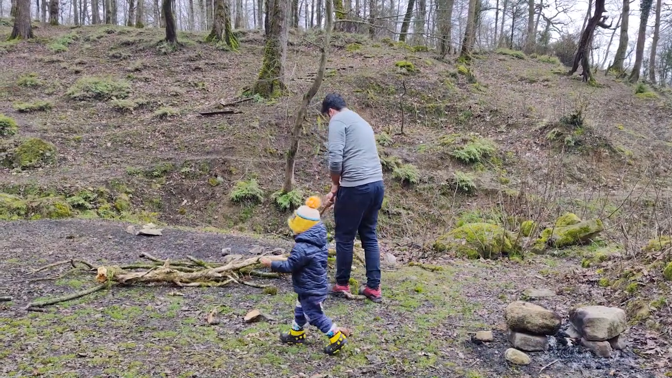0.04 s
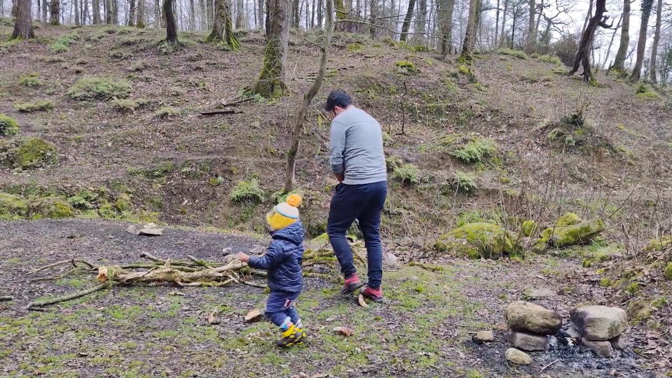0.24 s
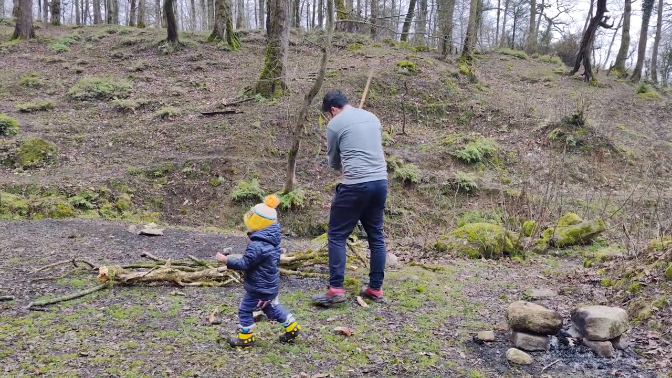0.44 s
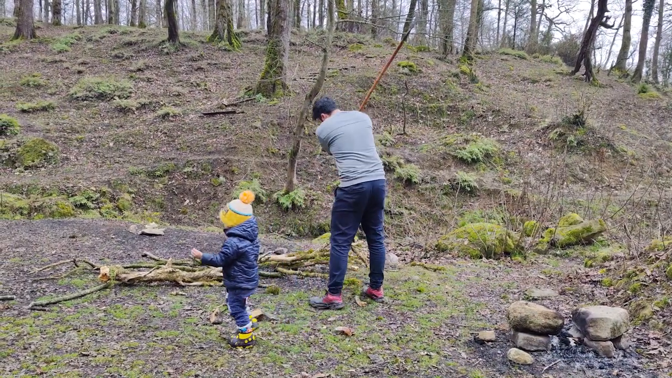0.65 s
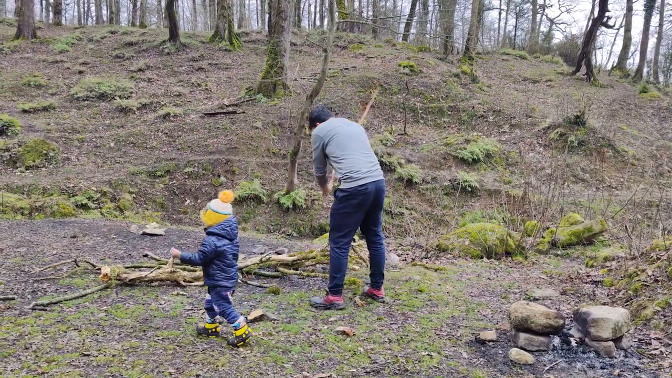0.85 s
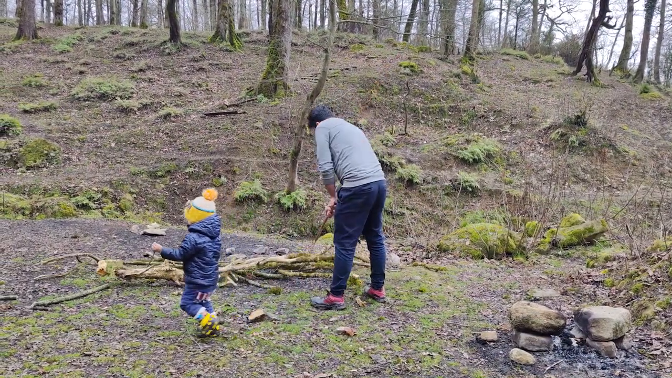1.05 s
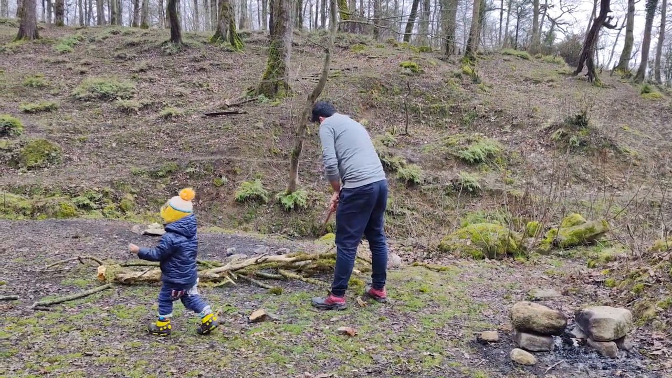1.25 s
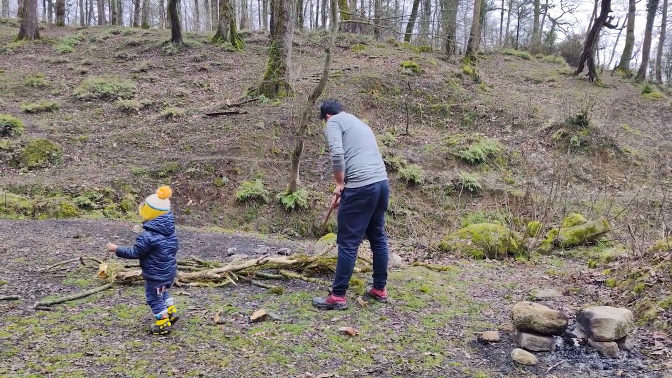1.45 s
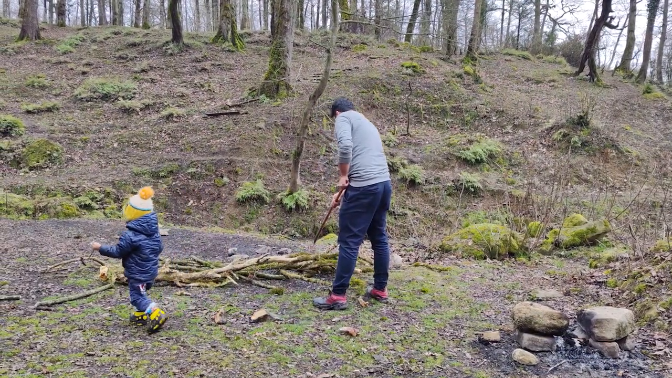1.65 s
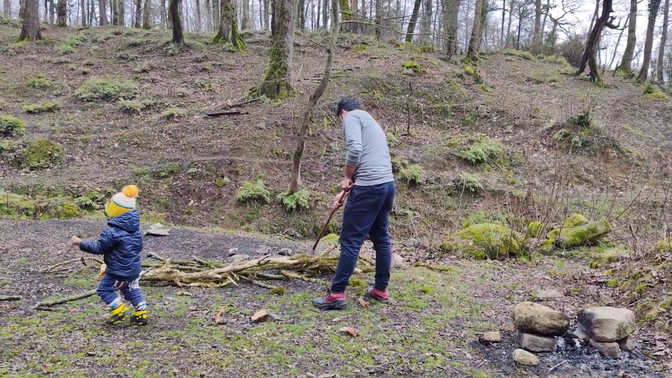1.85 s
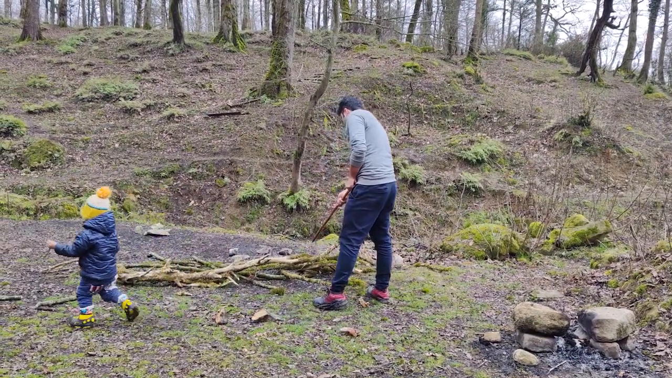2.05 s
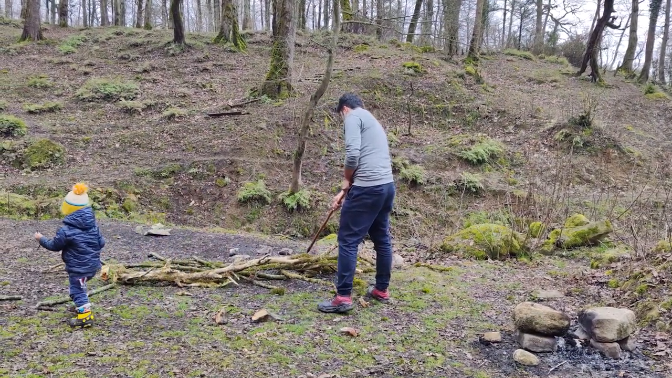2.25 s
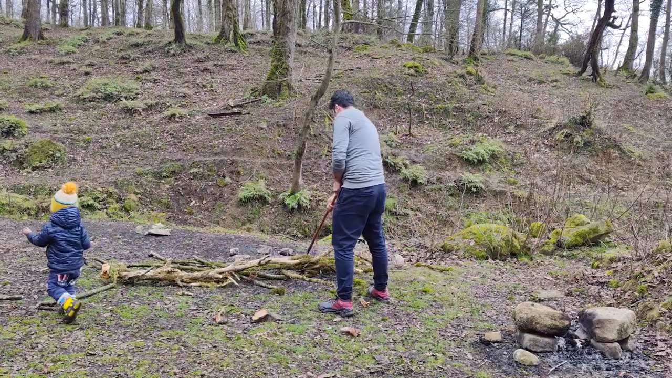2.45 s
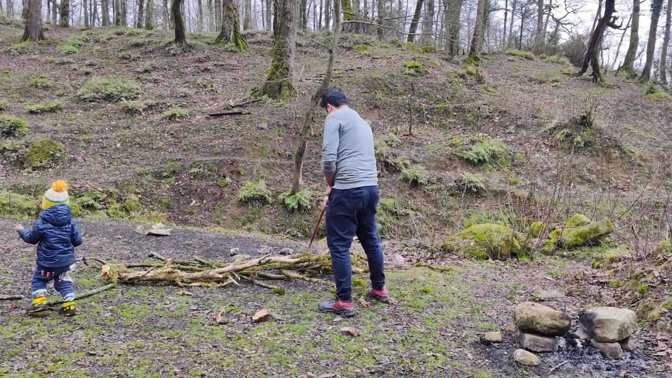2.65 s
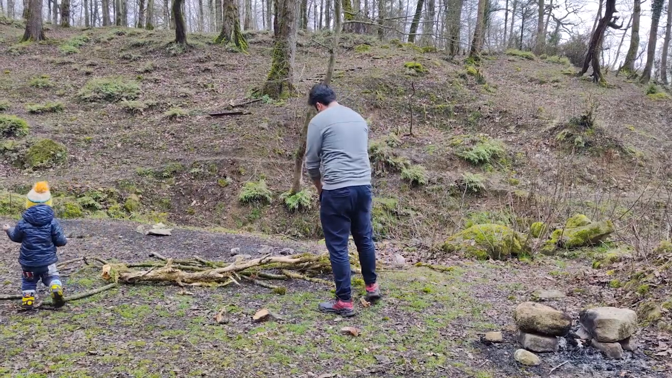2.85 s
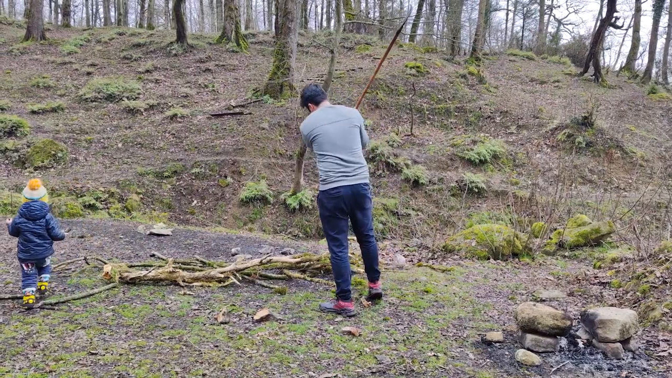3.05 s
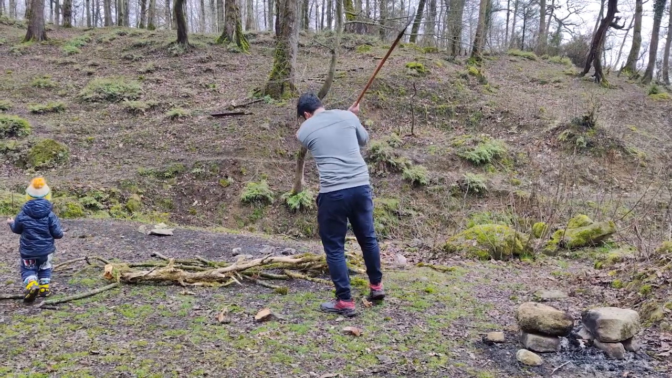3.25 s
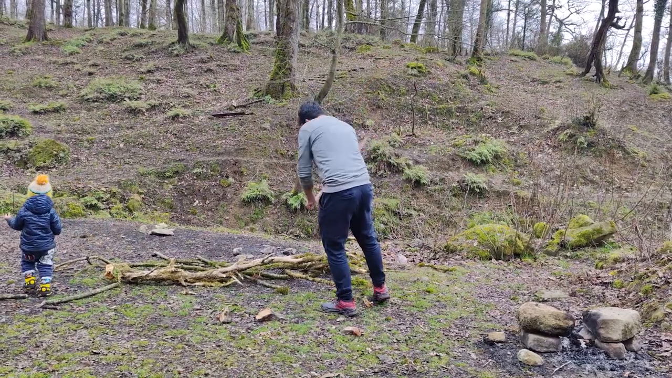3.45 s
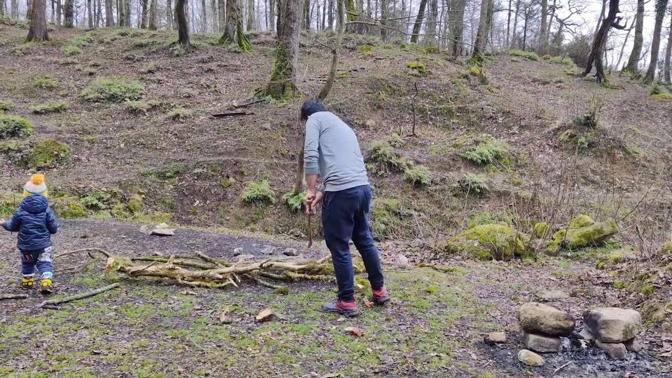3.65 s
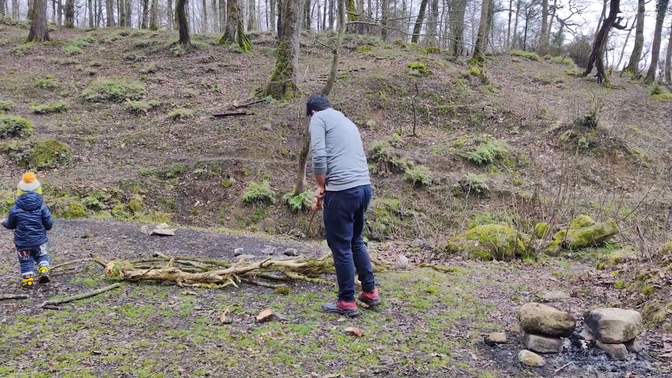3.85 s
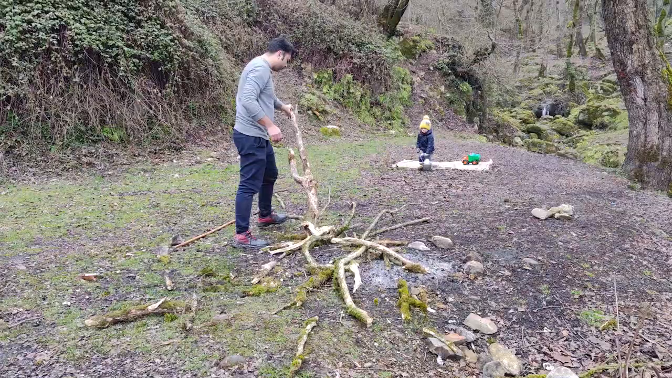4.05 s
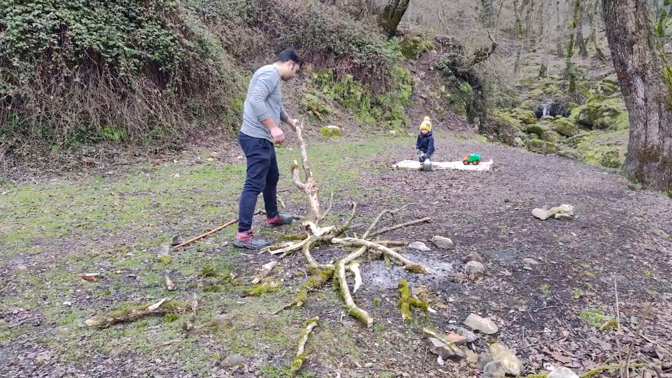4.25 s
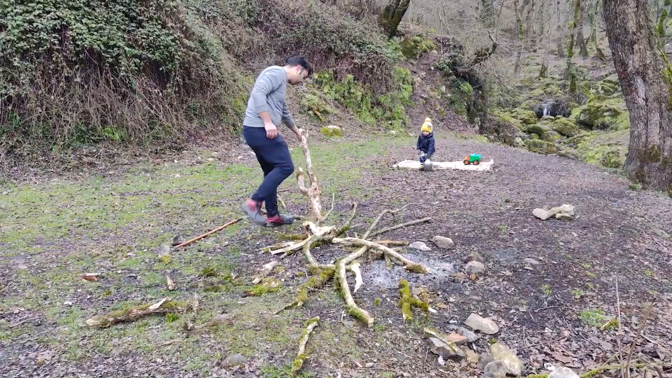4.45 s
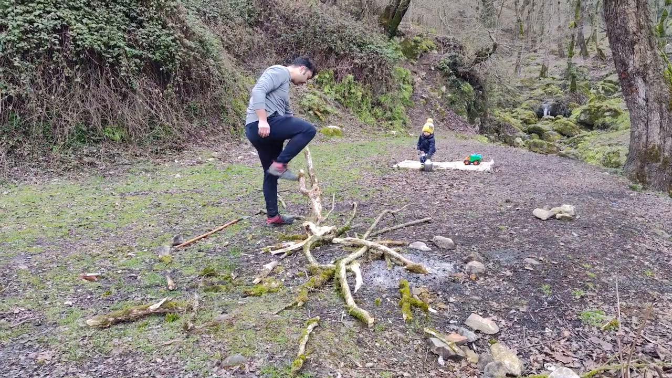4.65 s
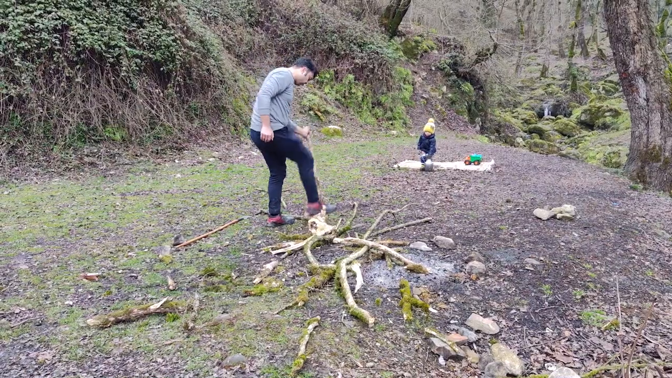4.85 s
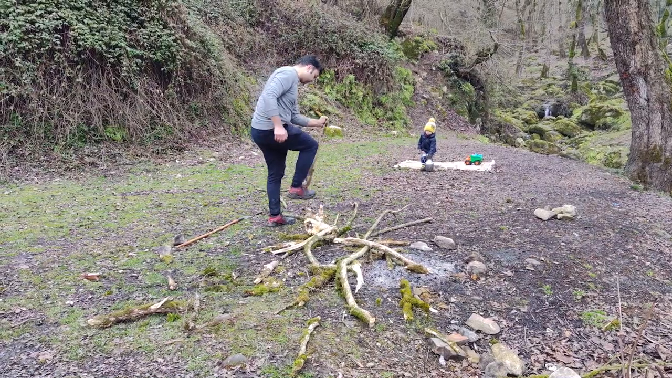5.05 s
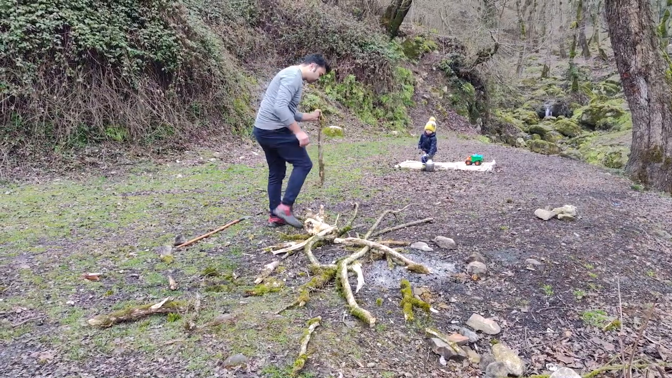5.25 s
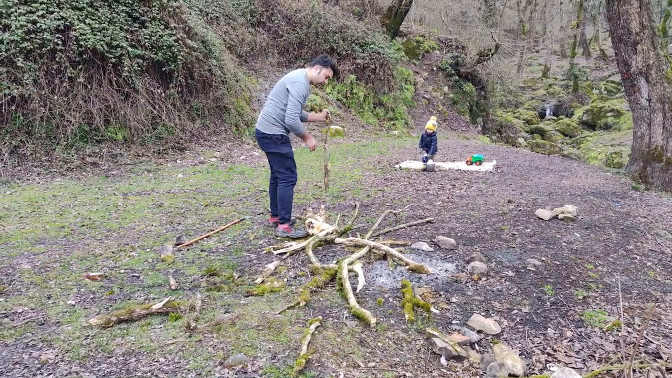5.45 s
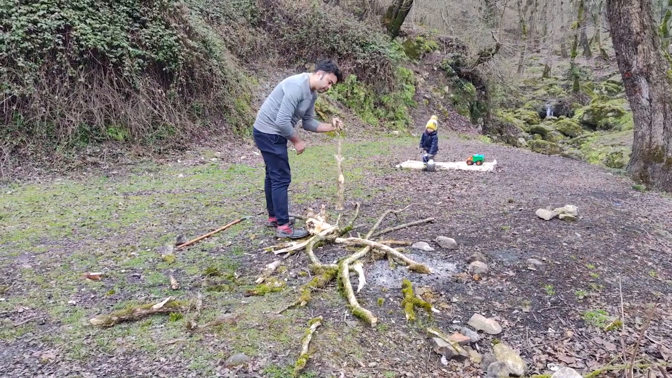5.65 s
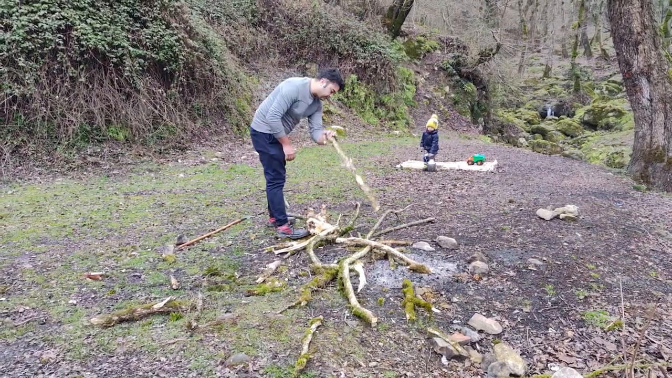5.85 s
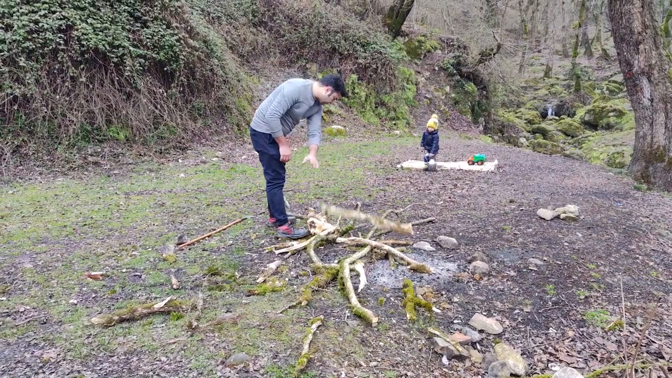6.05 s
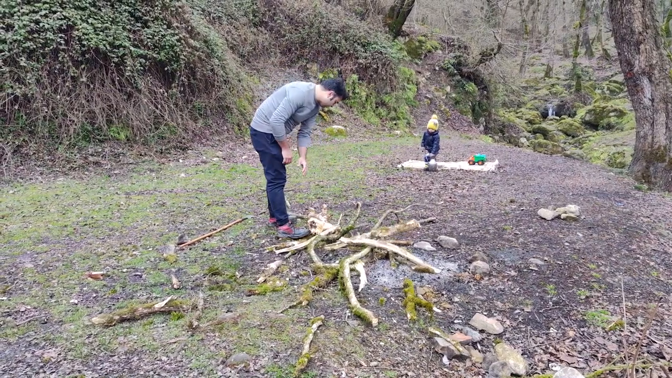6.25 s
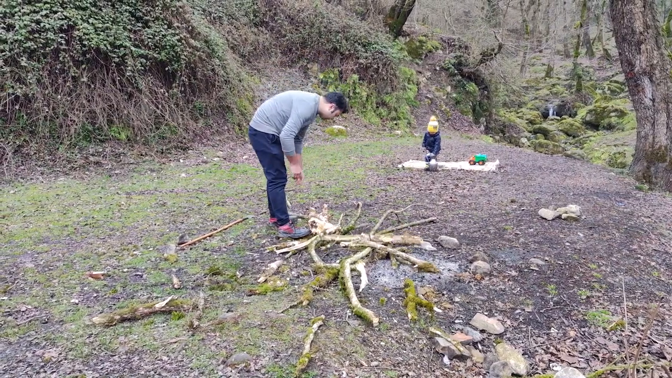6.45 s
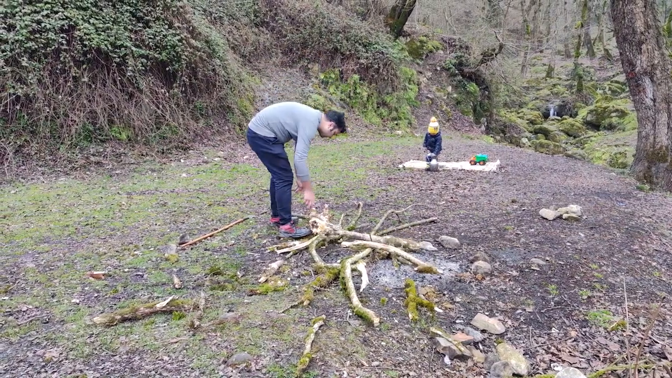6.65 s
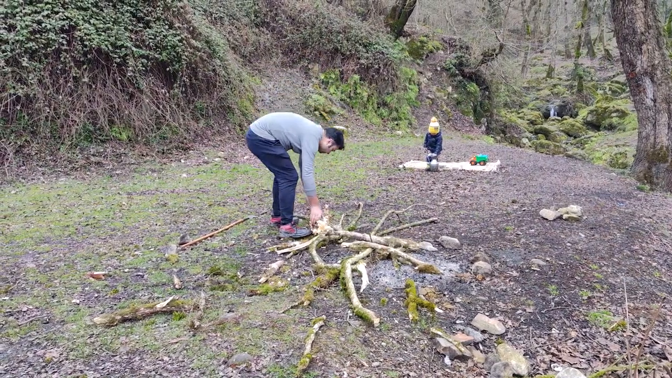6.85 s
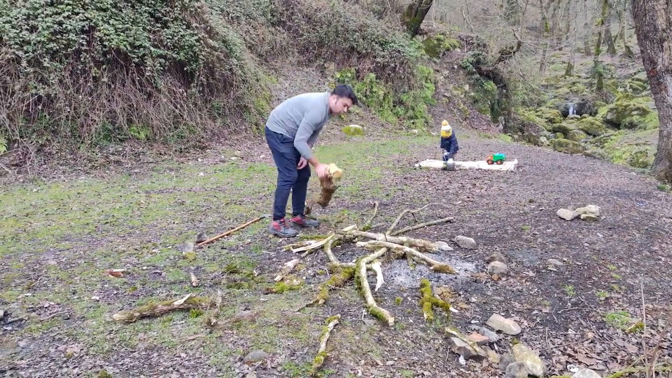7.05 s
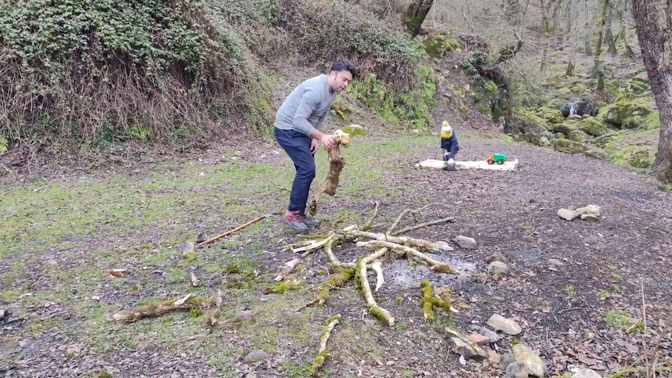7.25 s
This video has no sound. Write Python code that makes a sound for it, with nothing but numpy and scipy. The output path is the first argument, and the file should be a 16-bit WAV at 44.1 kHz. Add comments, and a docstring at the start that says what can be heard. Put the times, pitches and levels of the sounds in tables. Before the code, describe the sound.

Sharp woody cracks ring out unevenly with short forest echoes, followed by a stomp, a tiny splinter snap and a wooden drop, with birds and a stream behind.

```python
"""Breaking firewood in a woodland clearing

Two axe blows split dry branches below an earth bank; then, at a more open spot, a branch is stamped through,
a last splinter snaps and the piece is tossed on the pile. Cracks are dying bursts of uneven noise, with
decaying sines for the ringing wood. Bank and trees scatter them as echoes made of noise. A brook of filtered
noise runs behind, small birds call in sliding sines and something metal clinks far off in decaying modes."""
import sys
import numpy as np
from scipy import signal
from scipy.fft import rfft, irfft, next_fast_len
from scipy.io import wavfile

SR = 44100
rng = np.random.default_rng(int(sys.argv[2]) if len(sys.argv) > 2 else 0)


def dump(signal):
    """Clip the signal to [-1, 1] and save it as 16-bit WAV at the path in sys.argv[1]."""
    limited = np.clip(np.atleast_2d(signal).T, -1, 1)
    pcm = np.round(limited * 32767).astype(np.int16)
    wavfile.write(sys.argv[1], SR, pcm)


N = 321930
TIME = np.arange(N) / SR
HALF_SECOND = SR // 2  # samples
SIZE = next_fast_len(N + SR)  # transform length, with a second to spare
HZ = np.maximum(np.arange(SIZE // 2 + 1) * SR / SIZE, 1)
MOVE_S = 4.1  # the work moves from the bank to the open spot

# Source levels and left-right differences hold ahead of the filters that follow.
# Branches break. Each row: start in seconds, crack level in dB, crack decay time (60 dB) in seconds,
# corner in Hz above which it is dull, left-right difference in dB, splinter level in dB,
# thud level in dB, thud pitch in Hz.
BREAKS = [(1.1067, 2, 0.028, 4220, -1, -1, -30.5, 165), (3.68, 4.5, 0.02, 2170, 4, -5.5, -17, 235),
          (4.9603, 3.5, 0.019, 1560, 3.5, -2.5, -14, 268), (5.5422, -14, 0.0058, 14000, 0, -21, -31, 236)]
# A boot or a log comes down. Each row: start in seconds, level of the bark's crunch in dB,
# corner in Hz above which it is dull, left-right difference in dB, thud level in dB, thud pitch in Hz.
LANDINGS = [(.039, -28, 1100, 4, -32.5, 192), (2.395, -42, 2000, 2, -36, 220),
            (4.019, -38, 1200, 5, -39.5, 165), (4.9471, -23, 1200, 7, -16.5, 212),
            (5.0302, -14, 2520, 1, -25.5, 169), (5.47, -50, 1500, 0, -35, 236),
            (6.274, -17, 5900, 3, -23.5, 304), (6.303, -30, 12000, 9, -25, 210)]
# Spectrum of breaking wood. Each row: frequency in Hz, gain in dB.
WOOD_COLOUR = [(25, -42), (70, -27.5), (150, -4.5), (400, -2), (700, 0.5), (1000, -3), (1800, 1.5),
               (2600, -3), (4000, -1), (14000, -.5)]
# The last fibres splinter just after the main crack, short and bright.
SPLINTER_LAG_S, SPLINTER_T60_S, SPLINTER_HZ = 0.0045, 0.0067, 7500


def from_db(db):
    """Level: decibels become an amplitude ratio."""
    return 10 ** (np.asarray(db) / 20)


def panned(db):
    """Level difference: left and right gains share it equally, positive to the left."""
    return from_db(np.array([[db], [-db]]) / 2)


def per_hz(points):
    """Interpolation on a logarithmic frequency axis."""
    hz, value = np.transpose(points)
    return np.interp(np.log(HZ), np.log(hz), value)


def coloured(x, points):
    """Minimum-phase filtering: the folded cepstrum of a dB curve gives a causal response."""
    cepstrum = irfft(np.log(from_db(per_hz(points))), SIZE)
    cepstrum[1:SIZE // 2] *= 2
    cepstrum[SIZE // 2 + 1:] = 0
    response = np.exp(rfft(cepstrum))
    return irfft(rfft(x, SIZE) * response, SIZE)[..., :N]


def dulled(x, dull_hz):
    """One-pole low-pass: thick fibres let go more slowly, so their snaps are duller."""
    pole = np.exp(-2 * np.pi * dull_hz / SR)
    return signal.lfilter([1 - pole], [1, -pole], x)


def dying(t60):
    """Exponential decay: half a second of envelope, falling 60 dB in t60 seconds."""
    return 1000 ** (-TIME[:HALF_SECOND] / t60)


def ring(hz, db, t60):
    """Damped free vibration: one struck mode."""
    return from_db(db) * dying(t60) * np.sin(2 * np.pi * hz * TIME[:HALF_SECOND])


def burst(noise, t60):
    """Energy normalisation: dying noise carries the energy of its bare envelope."""
    envelope = dying(t60)
    shaped = noise * envelope
    energy = np.mean(np.sum(shaped ** 2, axis=-1))
    return shaped * np.sqrt(np.sum(envelope ** 2) / energy)


def resonant_noise(hz, width_hz, size):
    """Resonance: noise passes a two-pole filter and is scaled to rms 1."""
    r = np.exp(-np.pi * width_hz / SR)
    poles = [1, -2 * r * np.cos(2 * np.pi * hz / SR), r * r]
    x = signal.lfilter([1, 0, -1], poles, rng.standard_normal(size))
    return x / x.std()


def diffuse_noise():
    """Diffuse field: sound from all sides is alike at both ports chiefly in the bass."""
    # Each row: frequency in Hz, likeness of the two ports from 0 to 1.
    likeness = [(100, 0.76), (200, 0.83), (400, 0.57), (800, 0.0065), (1500, 0), (14000, 0.038)]
    mid, side = rfft(rng.standard_normal((2, SIZE)))
    alike = np.clip(per_hz(likeness), 0, 1)
    spectrum = np.sqrt((1 + alike) / 2) * mid + np.sqrt((1 - alike) / 2) * side * [[1], [-1]]
    return irfft(spectrum, SIZE)[:, :N]


def add(out, s, sound):
    """Superposition: mix a sound in at its time."""
    start = round(s * SR)
    out[:, start:start + sound.shape[-1]] += sound[..., :N - start]


def fibre_bursts(splinter_pan_db=-3, crunch_t60=0.022, twig_t60=0.0069):
    """Brittle fracture: lists each burst's start, level, decay time, dull corner and left-right difference."""
    # A twig ticks. Each row: start in seconds, level in dB, corner in Hz above which it is dull,
    # left-right difference in dB.
    twig_ticks = [(0.2244, -29, 5000, 2), (1.5127, -26, 13900, -1), (3.92, -38, 9000, 14)]
    main = [row[:5] for row in BREAKS]
    splinters = [(s + SPLINTER_LAG_S, db, SPLINTER_T60_S, SPLINTER_HZ, splinter_pan_db)
                 for s, *_, db, _, _ in BREAKS]
    crunches = [(s, db, crunch_t60, dull_hz, pan) for s, db, dull_hz, pan, _, _ in LANDINGS]
    twigs = [(s, db, twig_t60, dull_hz, pan) for s, db, dull_hz, pan in twig_ticks]
    return main + splinters + crunches + twigs


def avalanche(t60, dull_hz, unevenness_db=3.5, spread=0.31, rise_s=0.0007, alike_hz=700):
    """Fracture avalanche: fibres snap in uneven sizes; the treble differs a little from port to port."""
    growth = 1 - np.exp(-TIME[:HALF_SECOND] / rise_s)
    apart = rng.standard_normal((2, HALF_SECOND))
    snaps = rng.standard_normal(HALF_SECOND) + spread * (apart - dulled(apart, alike_hz))
    sizes = from_db(unevenness_db * np.minimum(rng.exponential(1, HALF_SECOND), 4))
    return dulled(burst(snaps * growth * sizes, t60), dull_hz)


def cracks():
    """Acoustic emission: each crack is an avalanche of snaps, coloured by the wood."""
    out = np.zeros((2, N))
    for s, db, t60, dull_hz, pan in fibre_bursts():
        add(out, s, from_db(db) * panned(pan) * avalanche(t60, dull_hz))
    return coloured(out, WOOD_COLOUR)


def radiated_cracks():
    """Radiated power: averaged over all directions, a break has the smooth spectrum of one equal-energy click."""
    out = np.zeros((1, N))
    for s, db, t60, dull_hz, _ in fibre_bursts():
        click = signal.unit_impulse(HALF_SECOND) * np.linalg.norm(dying(t60))
        add(out, s, from_db(db) * dulled(click, dull_hz))
    return coloured(out, WOOD_COLOUR)


def branches():
    """Bending modes: each piece rings as it parts or lands."""
    # Each row: start in seconds, then modes as frequency in Hz, level in dB, decay time (60 dB) in seconds.
    pieces = [(1.108, [(567, -11, 0.054), (668, -17.5, 0.037), (1823, -9.5, 0.026), (2550, -12, 0.024),
              (3010, -8, 0.023), (3570, -15, 0.028), (4900, -7, 0.024)]), (3.681, [(507, -17, 0.063),
              (656, -15, 0.1), (1028, -2.5, 0.025), (1297, -7, 0.033), (1690, -13, 0.032),
              (2750, -4, 0.018), (3030, -4, 0.016)]), (3.689, [(675, -11, .04), (1055, -16, 0.044)]),
              (4.9605, [(403, -18, .03), (674, -9.5, 0.017), (855, -14, 0.019), (1437, -3, 0.018),
              (1780, -11.5, .02), (2025, -12, 0.021), (5200, -15, 0.031)]), (5.543, [(2960, -25.5, 0.008),
              (5730, -21, 0.0096), (6420, -18, 0.013), (12500, -11, 0.0034)]), (6.275, [(307, -43, .06),
              (5620, -19, 0.017), (6600, -27, 0.013)]), (6.3035, [(3700, -33, 0.025),
              (6100, -20.5, 0.015)])]
    out = np.zeros((2, N))
    for s, modes in pieces:
        ringing = sum((-1) ** k * ring(*mode) for k, mode in enumerate(modes))
        add(out, s, ringing)
    return out


def bodies(knock_width=0.31, soil_share=0.37, low_cut_hz=100, knock_cycles=36, thud_cycles=10.8):
    """Damping per cycle: wooden knocks, hollow bodies of breaks and ground thuds die in set cycle counts."""
    # Short wooden knocks and the hollow body of the breaks.
    # Each row: start in seconds, level in dB, pitch in Hz.
    knocks = [(.040, -32, 610), (0.042, -39, 1360), (.048, -36.5, 377), (.098, -47, 400),
              (.444, -43.5, 665), (.528, -47.5, 1130), (1.32, -41.5, 700), (1.398, -41.5, 850),
              (2.396, -44.5, 510), (3.3238, -44.5, 2150), (3.528, -42, 690), (3.688, -14.5, 730),
              (3.983, -45.5, 680), (4.018, -41.5, 610), (4.948, -31.5, 1390), (4.961, -20.5, 800),
              (5.543, -32.5, 587), (6.274, -24, 655), (6.286, -31, 402)]
    out = np.zeros((2, N))
    for s, db, hz in knocks:
        soft = signal.butter(2, 2 * hz, fs=SR, output="sos")
        wood = signal.sosfilt(soft, resonant_noise(hz, knock_width * hz, HALF_SECOND))
        add(out, s, from_db(db) * burst(wood, knock_cycles / hz))
    for s, *_, db, hz in BREAKS + LANDINGS:
        t60 = thud_cycles / hz
        soil = from_db(db) * burst(resonant_noise(hz, hz / 2, HALF_SECOND), t60)
        add(out, s, soil_share * soil - ring(hz, db, t60))
    # neither wood nor ground radiates deep bass
    return signal.sosfilt(signal.butter(2, low_cut_hz, "high", fs=SR, output="sos"), out)


def rustle(grain_db=3.0, grain_size=140, fade_s=0.073):
    """Stick-slip friction: grains rub as chips settle, the axe is raised and a log is dragged out of the leaves."""
    # Each row: start in seconds, length in seconds, level in dB, centre in Hz, width in Hz.
    strokes = [(1.299, 0.16, -58, 1700, 1200), (3.07, .19, -59, 2500, 1600), (6.981, .4, -61, 2200, 2280),
               (6.98, .4, -59, 780, 700)]
    out = np.zeros((1, N))
    t = TIME[:SR]
    for s, length_s, db, hz, width_hz in strokes:
        steps = np.repeat(rng.standard_normal(SR // grain_size + 1), grain_size)[:SR]  # held for 140 samples
        grains = from_db(grain_db * steps)
        stroke = np.clip(np.minimum(t, length_s - t) / fade_s, 0, 1)
        add(out, s, from_db(db) * resonant_noise(hz, width_hz, SR) * grains * stroke)
    return out


def litter(per_s=6, level_db=-58, unevenness_db=2.5, t60=0.02):
    """Poisson process: leaves and twigs tick faintly underfoot at random instants."""
    sizes = from_db(unevenness_db * np.minimum(rng.exponential(1, N), 3))
    ticks = (rng.random(N) < per_s / SR) * sizes
    crumble = burst(rng.standard_normal((2, HALF_SECOND)), t60)
    return from_db(level_db) * signal.fftconvolve(ticks[None], crumble)[:, :N]


def bank_echo(smear=1.13, shaded_hz=1600, delay_s=0.0201, crack_db=-17, splinter_db=-3.5, pan_db=-15):
    """Rough reflection: the bank, off to the right, returns each axe blow once, smeared, its treble to the right."""
    # Colour of the bank's single echo. Each row: frequency in Hz, gain in dB.
    bank_colour = [(60, -25), (150, 0), (600, 3), (1000, -8), (1830, 3), (2500, -4), (4000, -2), (6000, 1),
                   (14000, -11)]
    out = np.zeros((2, N))
    for s, db, t60, dull_hz, _, splinters, *_ in BREAKS:
        if s < MOVE_S:
            back_s = s + delay_s
            crack = avalanche(smear * t60, dull_hz)
            splinter = avalanche(smear * SPLINTER_T60_S, SPLINTER_HZ)
            add(out, back_s, from_db(db + crack_db) * crack)
            add(out, back_s + SPLINTER_LAG_S, from_db(splinters + splinter_db) * splinter)
    bass = dulled(out, shaded_hz)
    return coloured(bass + (out - bass) * panned(pan_db), bank_colour)


def echoes(x, near_db, hold_s, near_t60, far_db, far_t60, gap_s, patchy_db=2.5, air_hz=2600, dulling_s=0.5):
    """Scattering: ground and trunks return uneven echoes that hold, then die; far woods add a duller tail."""
    t = TIME[:SR]
    trunks = np.interp(t, np.linspace(0, 1, 400), rng.standard_normal(400))
    cloud = diffuse_noise()[:, :SR]
    bright = np.exp(-t / dulling_s)  # the share of undulled echo falls with time
    cloud = bright * cloud + (1 - bright) * dulled(cloud, air_hz)
    near = from_db(near_db - 60 * np.maximum(t - hold_s, 0) / near_t60)
    far = from_db(far_db - 60 * t / far_t60)
    response = cloud * np.hypot(near, far) * from_db(patchy_db * trunks) * (t > gap_s)
    return signal.fftconvolve(x.mean(axis=0)[None], response)[:, :N]


def at_ports(x):
    """Interaural-style cues: direct sound reaches the two ports with different phase and shading."""
    # Each row: frequency in Hz, phase by which the left leads in radians.
    port_phase = [(25, .02), (125, 0.083), (250, 0.12), (500, 0.1), (1000, 1.47), (2000, 0.79),
                  (4000, 2.05), (8000, 1.8), (14000, 4.1)]
    # Each row: frequency in Hz, left-right difference in dB.
    port_balance = [(100, 0), (500, 0.5), (1300, 1), (2500, -4), (5000, -4), (7000, -6.5), (9000, 12.5),
                    (14000, 10.5)]
    side = np.array([[1], [-1]]) / 2
    turn = np.exp(1j * side * per_hz(port_phase)) * from_db(side * per_hz(port_balance))
    return irfft(rfft(x, SIZE) * turn, SIZE)[:, :N]


def whistle(start_hz, end_hz, length_s, flick_hz, flutter_db=3.0, waver=0.008, flick_power=8):
    """Frequency modulation: a thin note swells, slides, flutters and fades, with any flick at its end."""
    along = np.linspace(0, 1, int(length_s * SR))
    shake, bend = (np.interp(along, np.linspace(0, 1, 20), rng.standard_normal(20)) for _ in range(2))
    slide = start_hz + (end_hz - start_hz) * along + flick_hz * along ** flick_power
    phase = 2 * np.pi * np.cumsum(slide * (1 + waver * bend)) / SR
    swell = np.cbrt(np.sin(np.pi * along))
    return from_db(flutter_db * shake) * swell * np.sin(phase)


def bird(direct_db=0.0, blur_db=-1.5, blur_t60=0.19, answer_s=0.108, answer_db=-8):
    """Reverberation: small birds call from among the trees, which blur their notes."""
    # Rising calls, falling calls and a more distant bird. Each row: start in seconds, level in dB.
    up_calls = [(1.74, -66), (1.965, -59.5), (2.19, -57.5), (2.415, -56), (4.32, -59.5), (7.12, -57)]
    down_calls = [(4.075, -61), (4.495, -61.5), (6.87, -66)]
    far_calls = [(2.825, -68), (3.16, -72), (3.5, -64)]
    # each note: start Hz, end Hz before the flick, length s, final flick Hz
    upslur, high_slur = (4870, 5430, 0.06, 620), (6500, 6700, 0.05, 860)
    downslur, far_note = (7450, 5200, 0.165, 200), (3400, 3680, 0.06, 0)
    # a fainter, higher slur answers each rising call
    answers = [(s + answer_s, db + answer_db) for s, db in up_calls]
    out = np.zeros((1, N))
    for note, calls in ((upslur, up_calls), (high_slur, answers), (downslur, down_calls), (far_note, far_calls)):
        for s, db in calls:
            add(out, s, from_db(db) * whistle(*note))
    decay = dying(blur_t60)
    trees = rng.standard_normal((2, HALF_SECOND)) * decay / np.linalg.norm(decay)
    blurred = signal.fftconvolve(out, trees)[:, :N]
    return from_db(direct_db) * out + from_db(blur_db) * blurred


def clink(start_s=6.076, rattle_db=-52, low_hz=1400, high_hz=2250, rattle_t60=0.54):
    """Modal synthesis: far metal rings in struck modes, with a dying band of noise for its rattle."""
    # Each row: frequency in Hz, level in dB, decay time (60 dB) in seconds.
    metal_modes = [(1170, -56, .4), (1437, -50, 0.3), (1460, -46.5, .2), (1560, -53, .15),
                   (1720, -49.5, .33), (2020, -56, 0.26), (2007, -47, 0.42), (2100, -51, 0.34),
                   (2710, -54, 0.083)]
    out = np.zeros((2, N))
    band = signal.butter(2, [low_hz, high_hz], "band", fs=SR, output="sos")
    rattle = burst(signal.sosfilt(band, rng.standard_normal(HALF_SECOND)), rattle_t60)
    ringing = sum(rng.choice([-1, 1]) * ring(*mode) for mode in metal_modes)
    add(out, start_s, from_db(rattle_db) * rattle + ringing)
    return out


def background(pan_db=-1.0, brook_far_db=-16, brook_near_db=-0.5):
    """Stationary noise: even forest hush and a brook, nearer at the open spot, where a low drone joins."""
    # Spectra of the hush and of the brook. Each row: frequency in Hz, gain in dB.
    forest_air = [(20, -52), (60, -51.5), (120, -46.5), (190, -40), (300, -38), (470, -44.5), (600, -41),
                  (950, -52), (1800, -48), (3000, -54), (6000, -52), (14000, -63)]
    brook_colour = [(60, -51), (300, -54.5), (500, -62), (800, -42.5), (1600, -51.5), (3500, -67.5),
                    (7000, -63.5), (14000, -66)]
    drone_hz, drone_width_hz, drone_db, hum_db = 281, 9, -68, -60
    moved = TIME > MOVE_S
    air = coloured(diffuse_noise(), forest_air)
    brook = coloured(diffuse_noise(), brook_colour) * from_db(np.where(moved, brook_near_db, brook_far_db))
    hum = from_db(hum_db) * np.sin(2 * np.pi * drone_hz * TIME)
    drone = (hum + from_db(drone_db) * resonant_noise(drone_hz, drone_width_hz, N)) * moved
    return (air + brook + drone) * panned(pan_db)


def scene(echo_pan_db=0.0, ring_share=0.4, ring_dull_hz=1200):
    """Direct and scattered fields: wood, its echoes at either spot, and the forest around."""
    # Colour of the scattered echoes at either spot. Each row: frequency in Hz, gain in dB.
    bank_cloud = [(70, 2.5), (140, 6.5), (240, 0.5), (420, 1), (640, 1), (1000, -1), (1800, -1),
                  (4000, -0.5), (7000, 3), (14000, -6.5)]
    open_cloud = [(80, 2), (200, -4), (500, -5), (1400, -4), (4000, 1), (7000, 4.5), (14000, 1.5)]
    handling = bodies() + litter() + rustle()
    ringing = branches()
    far = bird() + clink()
    # what the surroundings receive: less of the ringing, and duller
    sources = radiated_cracks() + handling + ring_share * dulled(ringing, ring_dull_hz) + far
    moved = TIME > MOVE_S
    by_the_bank = echoes(sources * ~moved, near_db=-40.5, hold_s=0.031, near_t60=0.21,
                         far_db=-50.5, far_t60=1.15, gap_s=0.017)
    in_the_open = echoes(sources * moved, near_db=-46.0, hold_s=0.042, near_t60=0.45,
                         far_db=-56, far_t60=0.95, gap_s=0.0044)
    scattered = coloured(by_the_bank, bank_cloud) + coloured(in_the_open, open_cloud)
    direct = at_ports(cracks() + handling + ringing)
    return direct + far + bank_echo() + scattered * panned(echo_pan_db) + background()


def record(dry, ceiling=0.7, low_cut_hz=45, cutoff_hz=14300):
    """Transducer response: a peak near 7 kHz and a fall above, then soft saturation and a cut at both ends."""
    # Each row: frequency in Hz, gain in dB.
    microphone = [(20, -0.5), (90, -2), (350, -0.5), (470, -6), (600, -1.5), (3600, 2), (4300, -1),
                  (5200, -2), (6200, -1), (7100, 5), (7600, -4), (8100, -8), (14000, -8)]
    heard = ceiling * np.tanh(coloured(dry, microphone) / ceiling)
    heard = signal.sosfilt(signal.butter(1, low_cut_hz, "high", fs=SR, output="sos"), heard)
    return signal.sosfilt(signal.ellip(10, 0.2, 80, cutoff_hz, fs=SR, output="sos"), heard)


dry = scene()
out = record(dry)
dump(out)
```